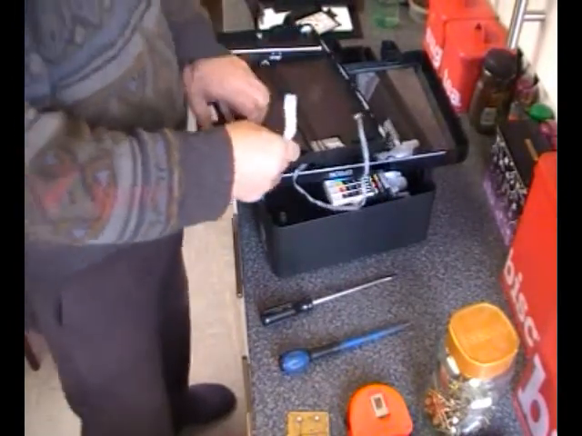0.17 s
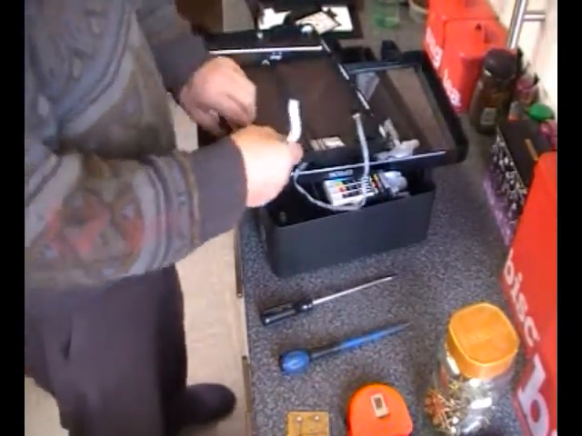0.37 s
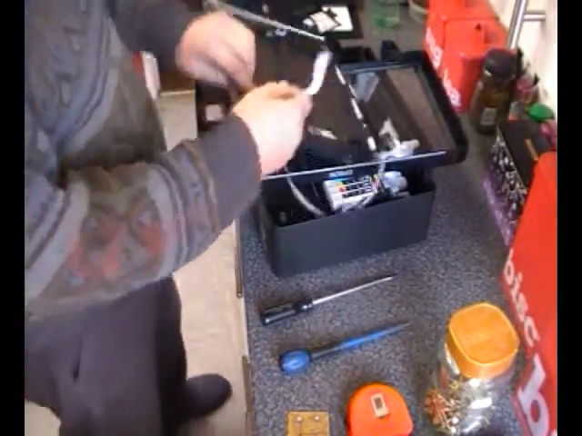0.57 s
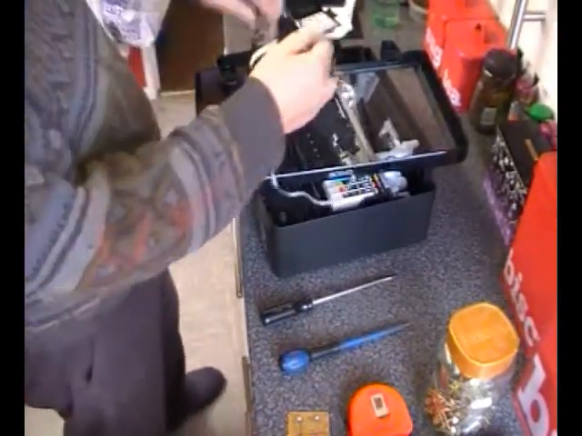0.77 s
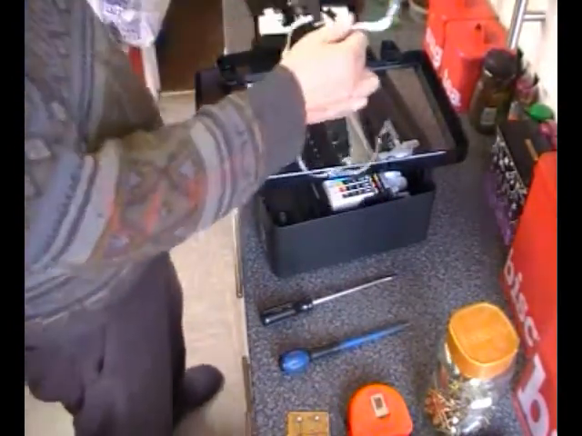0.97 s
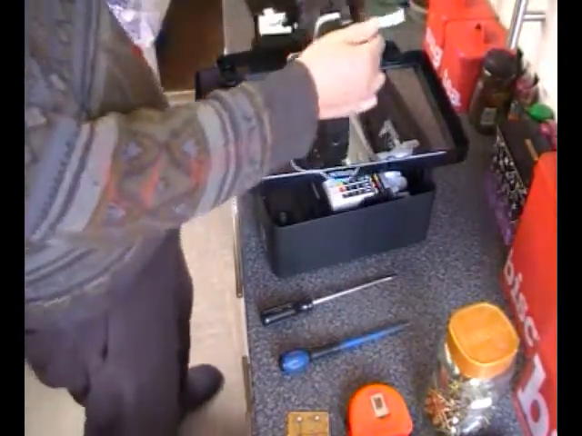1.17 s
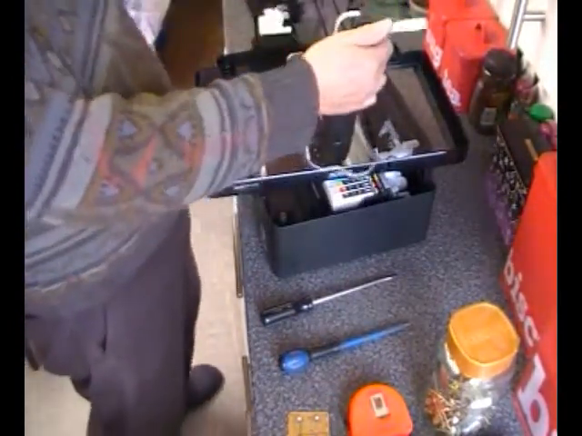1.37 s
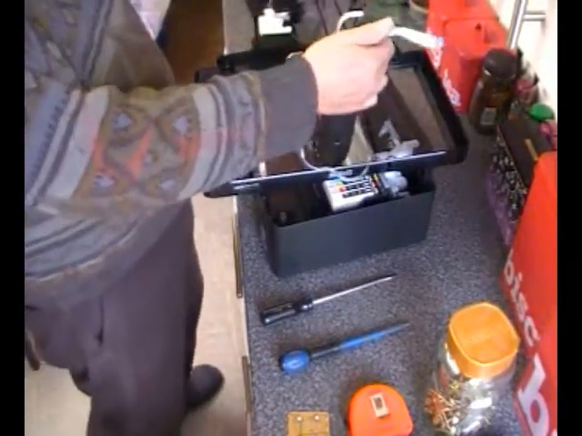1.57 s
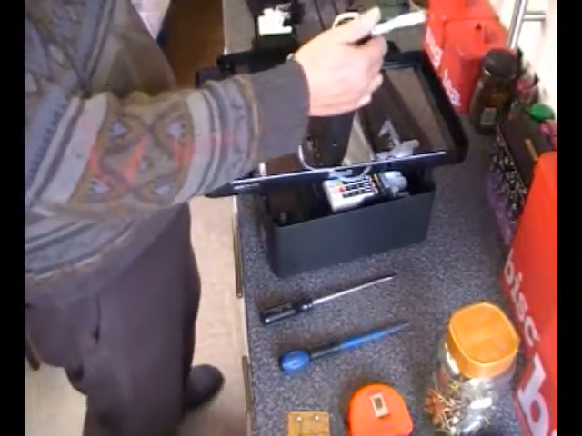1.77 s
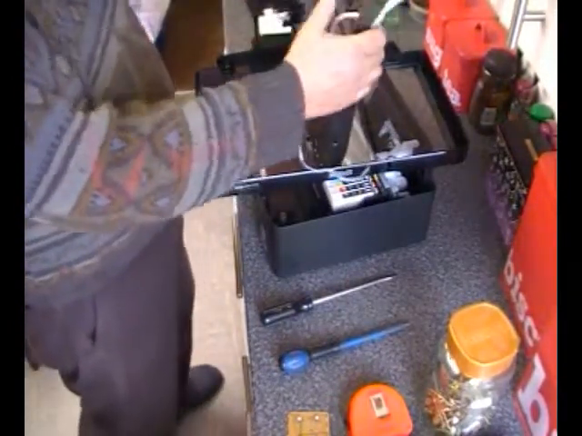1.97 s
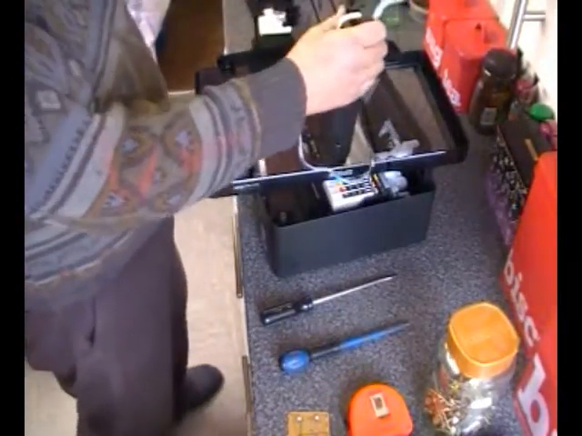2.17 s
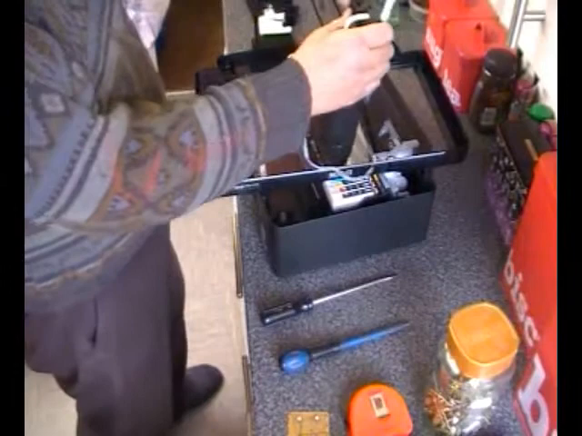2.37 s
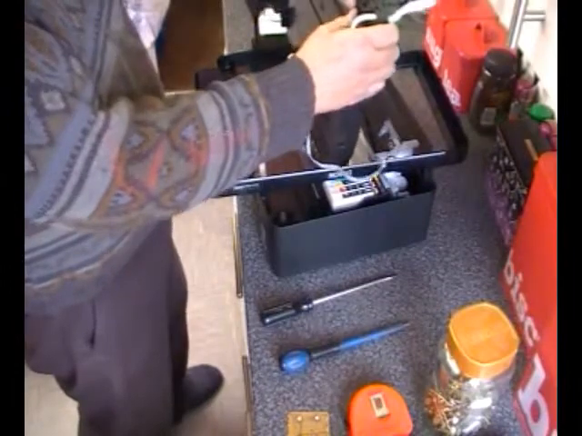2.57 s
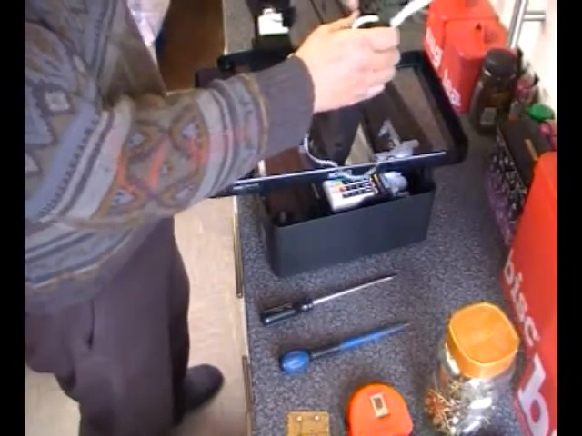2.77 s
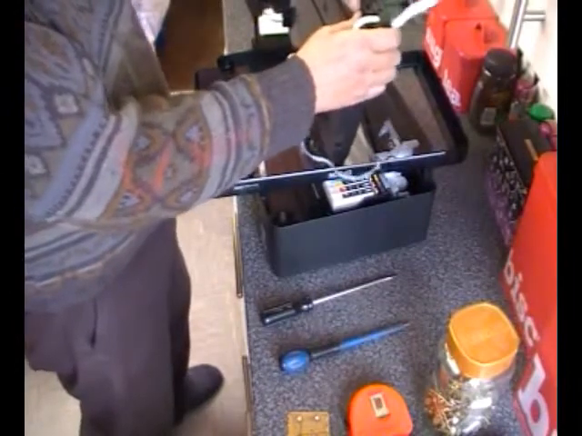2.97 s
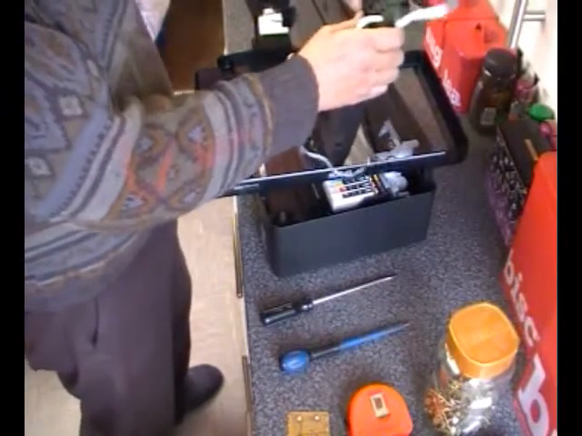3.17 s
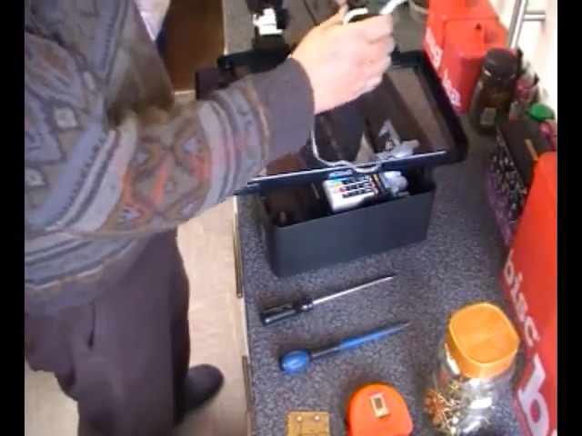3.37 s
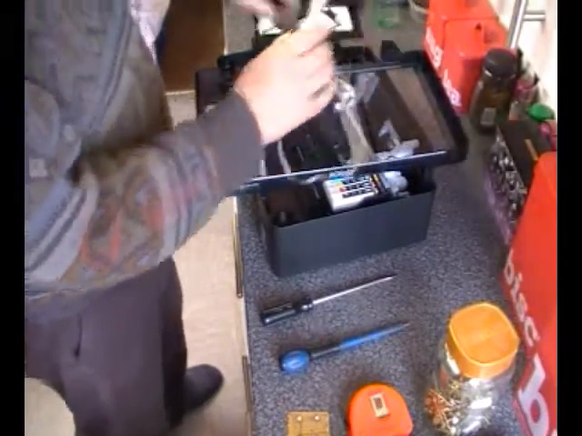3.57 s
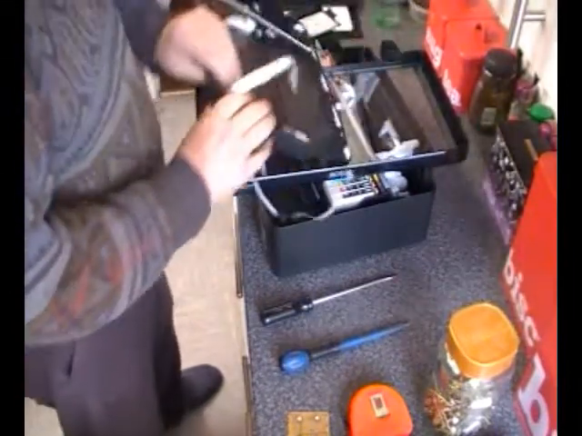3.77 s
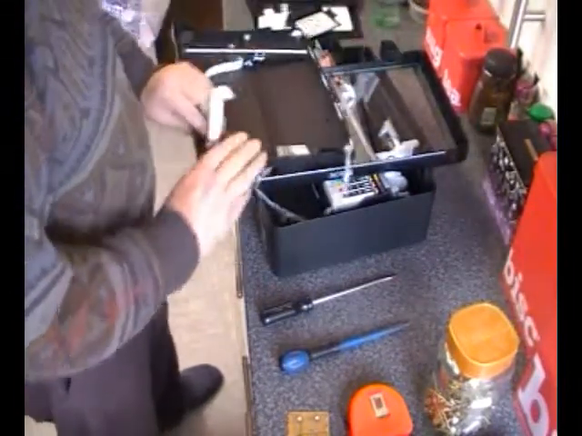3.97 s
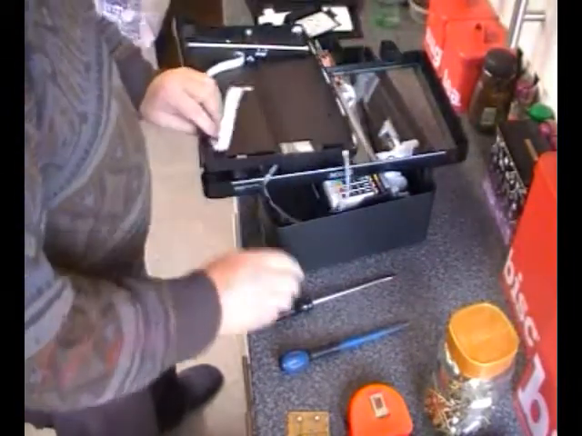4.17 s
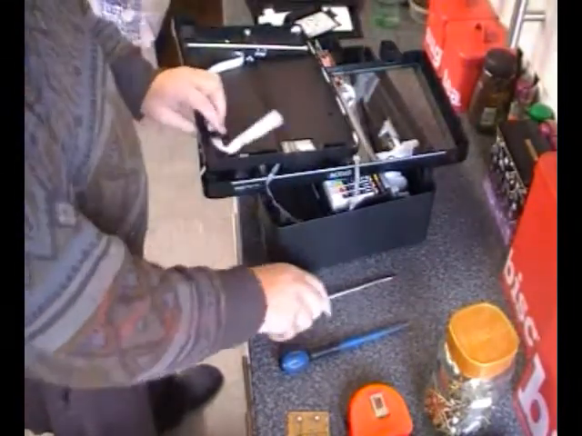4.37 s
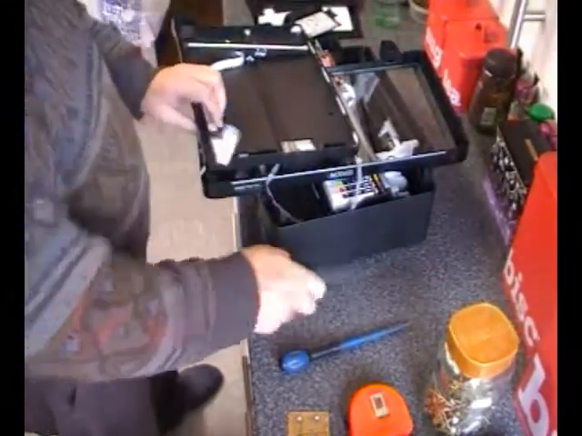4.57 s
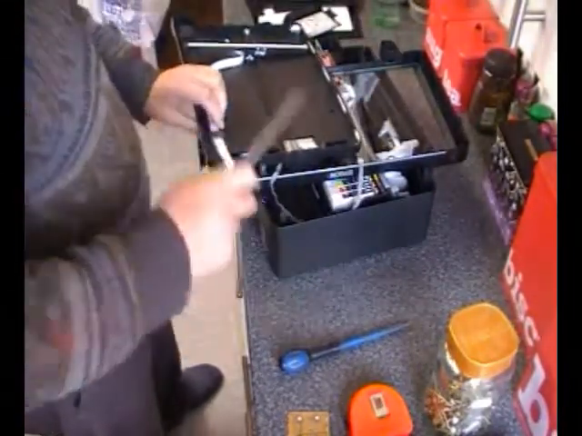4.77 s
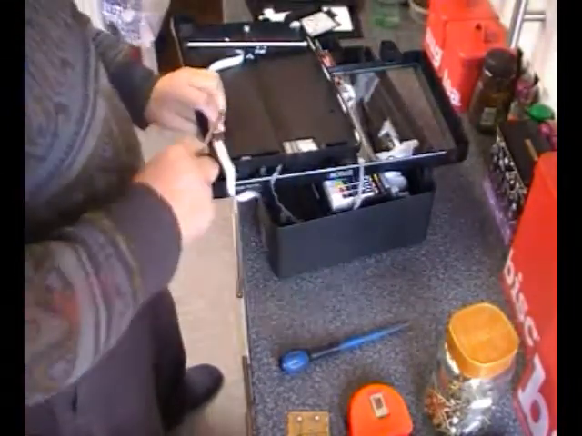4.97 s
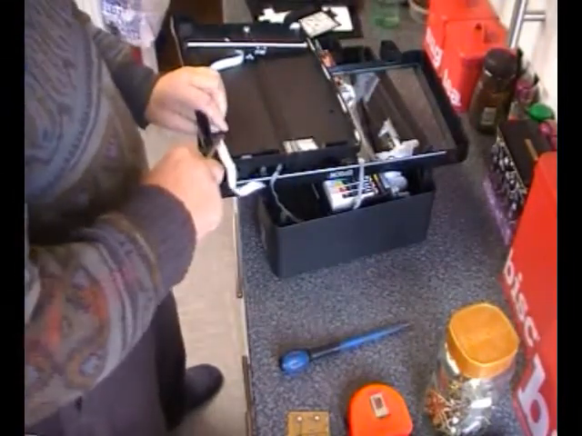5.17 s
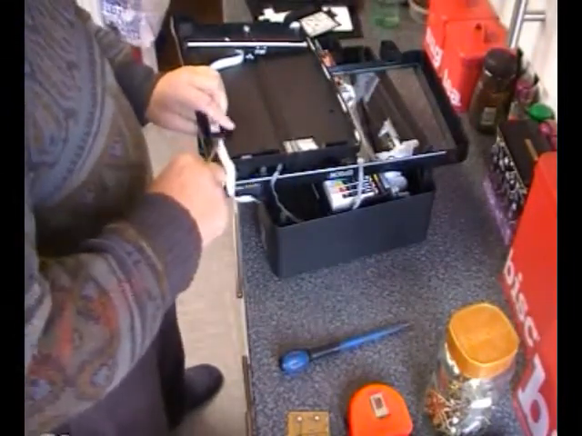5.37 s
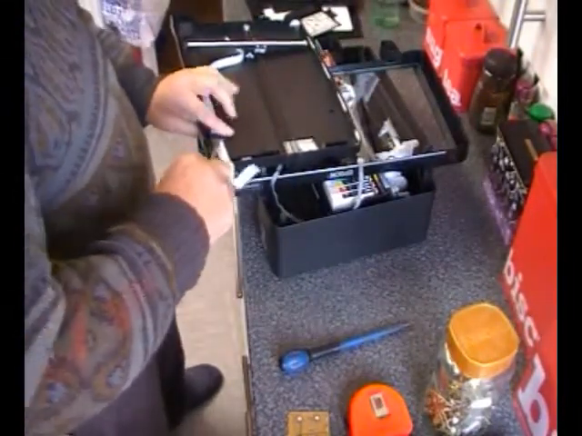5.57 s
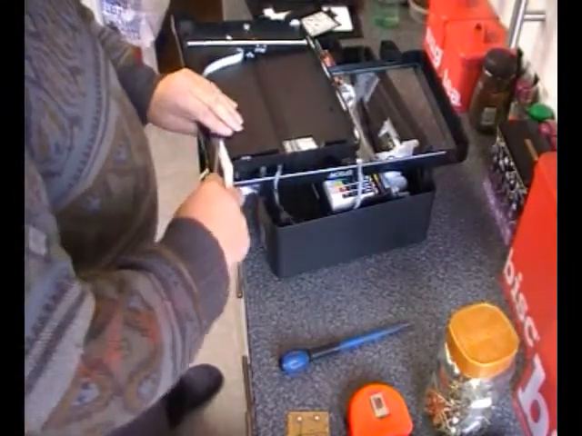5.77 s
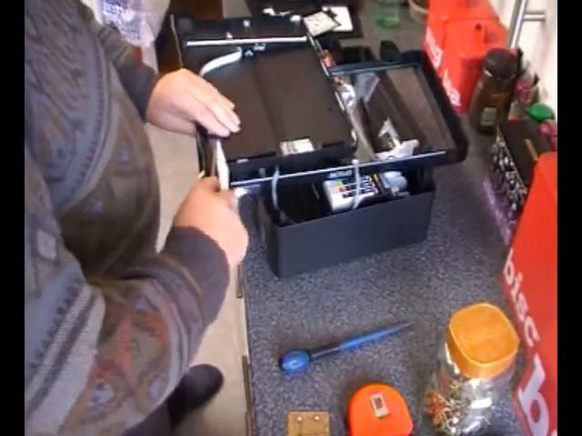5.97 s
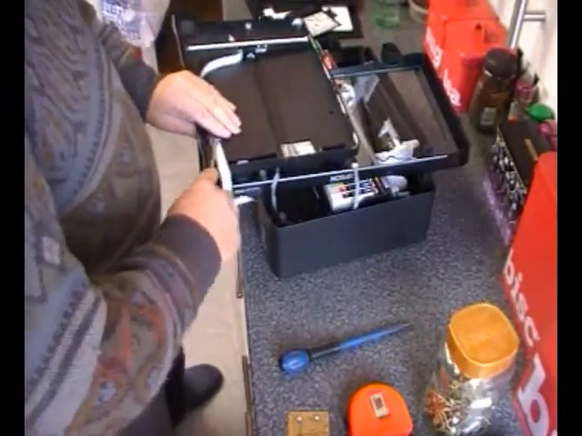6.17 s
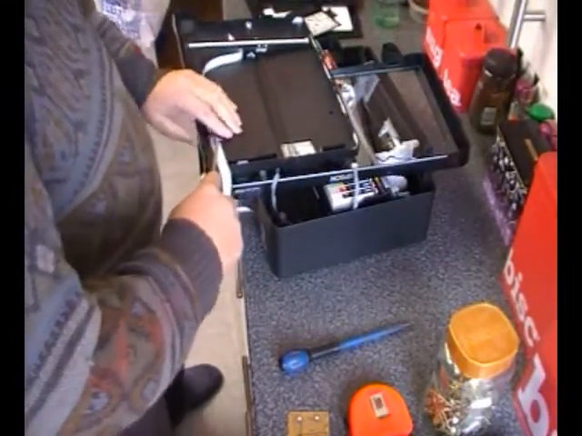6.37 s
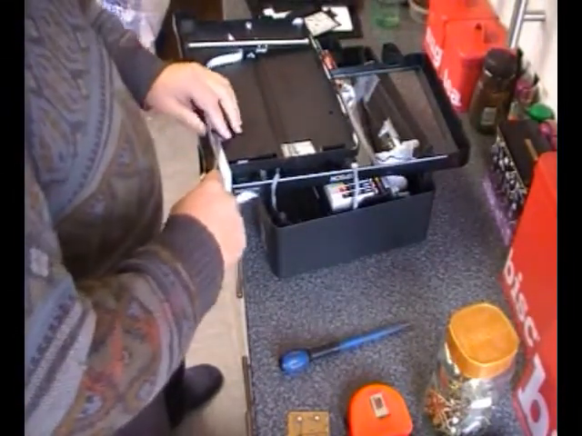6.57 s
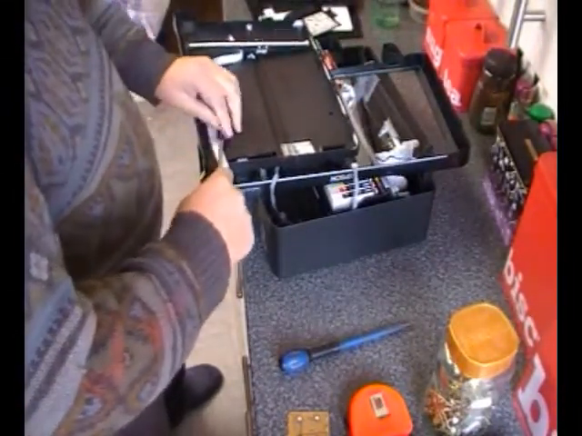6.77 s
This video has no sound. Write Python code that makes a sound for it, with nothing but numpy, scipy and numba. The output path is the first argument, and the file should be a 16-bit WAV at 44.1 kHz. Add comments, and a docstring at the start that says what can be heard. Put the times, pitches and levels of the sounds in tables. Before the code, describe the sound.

Close handling of a dismantled printer on a worktop: uneven rubbing and a slight panel hum, a sharp double click, small ticks and quieter scraping, then a bright springy snap. Later comes a cluster of heavy plastic knocks, brief screwdriver clatter, a solid steel knock, and busy cracking clicks while prying. A lively short room echo and low hiss surround it, with loud peaks slightly squeezed.

```python
"""On a worktop in a small hard-walled room, hands free a cable inside an opened printer, then pry with a screwdriver.
Plastic catches click, panels knock, wire ticks and steel knocks: each blow is a short burst of noise that rings a part.
Cable and fingers scrape in strokes of uneven slips, and one panel hums along as narrow-band noise.
The room answers blows and scrapes; steady hiss and low recorder noise that swells with the sound lie below,
and a camera's quick limiter tames the peaks."""
import sys
import numpy as np
from scipy import signal
from scipy.fft import rfft, irfft
from scipy.io import wavfile
from scipy.ndimage import uniform_filter1d
from numba import njit

SR = 44100
rng = np.random.default_rng(int(sys.argv[2]) if len(sys.argv) > 2 else 0)


def generate_wav(sig):
    """Save sig (samples, or channels by samples) to the path in sys.argv[1] as 16-bit PCM at SR."""
    pcm = np.round(np.clip(np.atleast_2d(sig).T, -1, 1) * 32767).astype(np.int16)
    wavfile.write(sys.argv[1], SR, pcm)


N = 300582
T = np.arange(N) / SR


def undb(db):
    """Turn decibels into a gain."""
    return 10 ** (np.asarray(db) / 20)


def unit(x):
    """Scale a sound to an average (rms) strength of 1."""
    return x / np.sqrt(np.mean(x ** 2))


def band(x, edges, order=3):
    """Keep mainly the pitches between two edges in Hz."""
    return signal.sosfilt(signal.butter(order, edges, "bandpass", fs=SR, output="sos"), x)


def convolve(x, response):
    """Pass a sound through an impulse response, keeping its length."""
    return signal.fftconvolve(x, response)[:len(x)]


def on_log_axis(hz, points):
    """Read a value between (f/Hz, value) points, along log frequency."""
    f, value = np.transpose(points)
    return np.interp(np.log(hz + 1), np.log(f), value)


# colour of the steady hiss: f/Hz, relative level/dB per Hz
HISS_COLOUR = [(20, -34.5), (70, -24), (140, -15), (230, -4.5), (450, -2.5), (900, -2), (2000, -2.5),
               (5000, -10.5), (13000, -14)]


def hiss(level_db=-57.5):
    """Steady background of room and microphone: random noise with a fixed colour."""
    hz = np.arange(N // 2 + 1) * SR / N
    spectrum = rfft(rng.standard_normal(N)) * undb(on_log_axis(hz, HISS_COLOUR))
    return undb(level_db) * unit(irfft(spectrum, N))


def recorder_noise(x, gain_db=-66, corner_hz=110, growth=0.38):
    """Low recorder noise swells with the loudness of the sound, but less strongly."""
    power = uniform_filter1d(x ** 2, SR // 50)
    strength = np.abs(power) ** (growth / 2)
    return undb(gain_db) * strength * unit(band(rng.standard_normal(N), (10, corner_hz), order=1))


def body(modes, ring_db, size=8192):
    """Response of a part: the bare contact plus resonances that die away; wider ones die sooner."""
    t = T[:size]
    response = np.zeros(size)
    for hz, width, db in modes:
        fade = np.exp(-np.pi * width * t)
        strength = undb(db + ring_db) * 2 * np.pi * width / SR
        response += strength * fade * np.cos(2 * np.pi * hz * t)
    response[0] += 1
    return response


def grains(size, spread_db):
    """Tiny stick-slip impulses, most weak and a few strong."""
    return rng.standard_normal(size) * undb(spread_db * np.minimum(rng.exponential(size=size), 6))


# how long the echo lasts at each pitch: f/Hz, time to fall 60 dB (T60)/s
ECHO_TIMES = [(200, 0.33), (800, 0.41), (3000, 0.31), (7000, 0.35), (12000, 0.25)]
# low resonances of the room: f/Hz, width/Hz, relative level/dB
ROOM_RESONANCES = [(204, 34, 11.5), (250.6, 11.3, 20), (362, 3.3, -42), (414, 6.8, -32)]


def room_tail(gain_db=2, gap_s=0.00037, build_s=0.0051, size=24576):
    """Worktop and near walls answer within milliseconds; each pitch range dies at its own rate, low modes ring."""
    t, hz = T[:size], np.arange(size // 2 + 1) * SR / size
    noise = rfft(grains(size, 1.57))
    edges = np.concatenate([[0], np.geomspace(400, SR / 2, 7)])
    tail = 0
    for lo, hi in zip(edges, edges[1:]):
        t60 = on_log_axis((lo + hi) / 2, ECHO_TIMES)
        slice_of_noise = irfft(noise * (hz >= lo) * (hz < hi))
        tail = tail + slice_of_noise * np.exp(-np.log(1000) * t / t60)
    tail = tail * np.clip((t - gap_s) / build_s, 0, 1)
    return undb(gain_db) * convolve(tail / np.linalg.norm(tail), body(ROOM_RESONANCES, ring_db=-7))


def registers(bands, tone, brightness, pivot_hz=2000):
    """Gain per event and band: the part's own tone, tilted up by a hard contact and down by a soft one."""
    octaves = np.log2(np.sqrt(np.prod(bands, axis=1)) / pivot_hz)
    return undb(np.array(tone) + np.outer(brightness, octaves))


# low, middle, upper and treble range of a blow: lower f/Hz, upper f/Hz
BLOW_RANGES = [(340, 660), (660, 2000), (2000, 4800), (5000, 14000)]
# All tables of blows: t/s, level/dB before the part's tone, brightness/dB per octave, chatter T60/s
# All tables of resonances: f/Hz, width/Hz, relative level/dB
# All tones of blows, how strongly a part radiates: low/dB, middle/dB, upper/dB, treble/dB


def blows(table, response, tone, rise_s, room_db=0, count=5, size=8192):
    """Each blow is a crack and a brief chatter that ring a part, heard directly and through the room."""
    t = T[:size]
    times, level_db, brightness, chatter_t60 = np.transpose(table)
    chatter = 1000. ** (-t / chatter_t60[:, None])
    crack = 0.091 * np.exp(-t / 0.00077)
    force = grains((len(times), size), 1.4) * (chatter + crack) * (1 - np.exp(-t / rise_s))
    ring = signal.fftconvolve(force, response[None], axes=1)[:, :size]
    sounds = 0
    for edges, gain in zip(BLOW_RANGES, registers(BLOW_RANGES, tone, brightness).T):
        part = band(ring, edges)
        # a blow's level is its energy packed into 4 ms
        strength = np.sqrt(np.sum(part ** 2, axis=1) / (.004 * SR))
        sounds = sounds + part * (undb(level_db) * gain / strength)[:, None]
    # blows land on different spots: a few patterns of reflections take turns
    tails = [room_tail() for _ in range(count)]
    # bright blows beam straight up, so less of them comes back from the room
    echo_db = room_db - 0.2 * np.maximum(brightness, 0)
    out = np.zeros(N + SR)
    for k, (s, sound) in enumerate(zip(times, sounds)):
        start = int(s * SR)
        echo = signal.fftconvolve(sound, tails[k % count])
        out[start:start + size] += sound
        out[start:start + len(echo)] += undb(echo_db[k]) * echo
    return out[:N]


# thumps of the case, its resonances and its tone: columns as listed above blows
THUMPS = [(1.195, -44.5, 0, .03), (1.222, -38, 0, 0.025)]
CASE_RESONANCES = [(363, 32, -2), (850, 63, -1)]
CASE_RADIATION = (-1.5, -2.5, -42, -9.5)


def case_thumps():
    """The hollow case rocks on the worktop and rings at two pitches."""
    response = body(CASE_RESONANCES, ring_db=10)
    return blows(THUMPS, response, CASE_RADIATION, rise_s=0.004, room_db=4.5, count=2)


# flicks of the wire, its resonances and its tone: columns as listed above blows
WIRE_FLICKS = [(1.189, -41.5, 0.27, .012), (1.3, -49.5, 0.83, 0.077), (1.561, -51, 0.58, 0.013),
               (1.665, -57.5, 0.077, 0.025)]
WIRE_RESONANCES = [(6860, 150, -7), (7500, 460, -6), (8130, 300, 0)]
WIRE_RADIATION = (-3, -2.5, -6.5, -2.5)


def wire_ticks():
    """The wire flicks against small metal parts, which ring high up."""
    response = body(WIRE_RESONANCES, ring_db=19)
    return blows(WIRE_FLICKS, response, WIRE_RADIATION, rise_s=0.0014, room_db=2.5, count=2)


def stroke(start, length, swell_db, attack_s=0.029, release_s=0.033):
    """Pressure of one stroke: it sets in, grows or eases steadily, then lets go."""
    attack = np.clip((T - start) / attack_s, 0, 1)
    release = np.clip(1 - (T - start - length) / release_s, 0, 1)
    progress = np.clip((T - start) / length, 0, 1)
    return attack * release * undb(swell_db * (progress - .5))


# strokes that set the panel humming: t/s, length/s, mid-stroke level/dB, swell from start to end/dB
HUMMING_STROKES = [(0, 0.088, -52, 0), (0.172, 0.276, -55, 3)]


def panel_hum(mode_hz=856, width_hz=13):
    """The dragged cable's friction keeps one panel resonance sounding while the stroke lasts: narrow noise."""
    edges = (mode_hz - width_hz / 2, mode_hz + width_hz / 2)
    ring = unit(band(rng.standard_normal(N), edges, order=1))
    pressure = sum(undb(db) * stroke(start, length, swell_db)
                   for start, length, db, swell_db in HUMMING_STROKES)
    return ring * pressure


def hesitation(depth_db=2, rate_per_s=70):
    """A dragging hand catches and lets go many times a second: the level moves in small random steps."""
    hold = SR // rate_per_s
    steps = np.repeat(np.clip(rng.standard_normal(N // hold + 1), -2, 2), hold)[:N]
    return undb(depth_db * uniform_filter1d(steps, hold // 10))


# strokes over the shell: t/s, length/s, mid-stroke level/dB before tone, brightness/dB per octave,
# swell from start to end/dB
SHELL_STROKES = [(0, 0.08, -43.5, 1, -22), (0.132, 0.1, -49.5, 2, 12), (0.285, 0.032, -43.5, 0, 1.5),
                 (0.354, 0.19, -42, 0, 2.5), (0.56, 0.12, -45, 0.4, -14), (0.762, 0.067, -41, -1, -11),
                 (0.854, 0.15, -47.5, 1.5, -3.5), (1.029, 0.084, -51.5, -1, 1),
                 (1.334, 0.067, -56, 0.8, -2), (1.698, 0.061, -58.5, 1.5, -8), (1.89, 0.23, -69.5, 5, 0),
                 (2.131, 0.047, -49.5, -0.5, 6.5), (2.314, 0.094, -50, -1, 2),
                 (2.63, 0.18, -53.5, 0.9, -7.5), (2.825, 0.17, -72, -4.5, -5), (3.294, 0.069, -51, -1, 7),
                 (3.503, 0.042, -37.5, .5, -7.5), (3.582, 0.25, -53.5, 0, -9), (3.792, 0.084, -46, 0.1, 16),
                 (3.857, 0.12, -34.5, -0.6, -4), (4, 0.045, -40, 2, 0), (4.34, .24, -52.5, -2, -5),
                 (4.845, 0.25, -63, -1, -21), (5.159, 0.068, -60, -1, -2), (5.35, 0.066, -45.5, -3, -17),
                 (5.525, .11, -61, -4.5, 6), (5.769, 0.066, -36, -0.7, -4),
                 (5.854, 0.098, -32, -2.5, -12.5), (6.098, 0.17, -39.5, -0.5, -5.5),
                 (6.335, 0.08, -42, 0.5, 1), (6.506, 0.13, -54, -1.5, -5), (6.654, 0.063, -48.5, -0.4, -15),
                 (6.764, .05, -63, 1, 0)]
# low, middle and treble range of a scrape: lower f/Hz, upper f/Hz
SCRAPE_RANGES = [(340, 700), (700, 4400), (4500, 14000)]
# how strongly scrapes radiate: low/dB, middle/dB, treble/dB
SCRAPE_RADIATION = (-11, 0, -3)
# resonances of the plastic shell, also used by the knocks and clicks below: f/Hz, width/Hz, relative level/dB
SHELL_RESONANCES = [(234.8, 19.3, -0.5), (315.5, 22, -0.5), (404.6, 3.2, -14), (575, 19, 5.5),
                    (600, 63, -1.5), (796, 59, 4), (899, 84, 9), (1040, 5.7, -13), (1196, 100, 3.5),
                    (1353, 250, 5.5), (1554, 140, 6.5), (1681, 44, 1.5), (1806, 180, 6.5), (2155, 170, 6),
                    (2397, 120, 3.5), (2670, 120, -7), (2800, 450, 6.5), (3174, 42, 6.5), (3340, 400, 3.5),
                    (3930, 200, 2)]


def scraping(slips_per_s=420, slip_s=0.0031, spread_db=2.5, ticks_per_s=70, tick_db=-6, room_db=2):
    """Cable and fingers drag over the shell in strokes made of uneven little slips."""
    slip_happens = rng.random(N) < slips_per_s / SR
    slips = slip_happens * undb(spread_db * np.minimum(rng.exponential(size=N), 3))
    # a little steady sliding lies under the slips
    grip = unit(convolve(slips, np.exp(-T[:SR // 20] / slip_s))) + .15
    # an edge catches on a rib and lets go with a tick
    ticks = (rng.random(N) < ticks_per_s / SR) * rng.standard_normal(N)
    rubbing = unit(grip * rng.standard_normal(N)) + undb(tick_db) * unit(ticks)
    scrape = convolve(rubbing, body(SHELL_RESONANCES, ring_db=0.5))
    pressure = 0
    for start, length, db, brightness, swell_db in SHELL_STROKES:
        gains = registers(SCRAPE_RANGES, SCRAPE_RADIATION, brightness).T
        pressure = pressure + gains * undb(db) * stroke(start, length, swell_db)
    sound = sum(unit(band(scrape, edges)) * gain for edges, gain in zip(SCRAPE_RANGES, pressure))
    sound = sound * hesitation()
    return sound + undb(room_db) * convolve(sound, room_tail())


# clicks of the latch, its resonances and its tone: columns as listed above blows
LATCH_CATCHES = [(4.127, -24, 1.1, 0.017), (4.184, -30, 0.46, .02)]
LATCH_RESONANCES = [(4760, 75, -9), (6300, 70, -6), (8240, 300, 4), (9900, 200, -13), (12200, 430, 2)]
LATCH_RADIATION = (-24, -16, -2.5, 2)


def latch_clicks():
    """A latch catches as the lid comes down, with a sharp start and a bright ring."""
    response = body(LATCH_RESONANCES, ring_db=2)
    return blows(LATCH_CATCHES, response, LATCH_RADIATION, rise_s=0.00045, room_db=-3, count=1)


# snaps of the cable clip, its resonances and its tone: columns as listed above blows
CABLE_SNAPS = [(2.436, -21.5, 0, 0.024), (2.485, -25.5, 0, 0.02)]
CLIP_RESONANCES = [(208, 32, 5.5), (623, 38, 9.5), (2600, 590, -2), (5450, 130, -7), (5860, 72, -15),
                   (7250, 77, -1), (7680, 190, 6), (9900, 84, -14)]
CLIP_RADIATION = (-15.5, -11, 0, 1)


def clip_snaps():
    """The cable springs out of its clip, which rings both low and high."""
    response = body(CLIP_RESONANCES, ring_db=4)
    return blows(CABLE_SNAPS, response, CLIP_RADIATION, rise_s=0.0029, room_db=1, count=2)


# clatter of the screwdriver, its resonances and its tone: columns as listed above blows
TOOL_CLATTER = [(4.493, -34, -7.5, 0.27), (4.514, -39, 6, 0.05), (4.56, -22, 2.5, 0.012),
                (4.581, -22.5, 1.5, 0.079), (4.605, -40, -6, 0.017), (4.696, -42, 5.5, 0.16)]
TOOL_RESONANCES = [(850, 83, -4), (996, 34, -0.5), (1470, 120, -8), (1712, 97, 6.5), (2400, 240, 6),
                   (3040, 100, 11), (3440, 110, -18), (4200, 50, -25), (5800, 230, -5), (8320, 290, 2),
                   (11600, 320, -22)]
TOOL_RADIATION = (-21.5, -0.5, -6.5, -18)


def tool_rattles():
    """The screwdriver clatters as it is lifted, ringing at its own pitches."""
    response = body(TOOL_RESONANCES, ring_db=9)
    return blows(TOOL_CLATTER, response, TOOL_RADIATION, rise_s=0.0031, room_db=1, count=6)


# knocks of the blade, resonances and tone of the frame: columns as listed above blows
STEEL_KNOCKS = [(5.214, -48, 0.74, 0.027), (5.272, -15.5, 0.82, 0.029), (5.407, -27, 0, 0.027)]
FRAME_RESONANCES = [(560, 29, 7), (576, 15, 9), (837, 74, 14), (1190, 78, 1), (1480, 270, 6.5),
                    (1800, 280, 3), (2100, 250, 7), (2930, 200, 0), (3130, 200, -1), (3470, 150, -26),
                    (4660, 110, -18), (6450, 380, 6), (7100, 550, 0), (9100, 190, 6)]
FRAME_RADIATION = (-14.5, -1, -4.5, -11.5)


def blade_knocks():
    """The steel screwdriver blade knocks on the frame and makes it ring."""
    response = body(FRAME_RESONANCES, ring_db=6)
    return blows(STEEL_KNOCKS, response, FRAME_RADIATION, rise_s=.006, room_db=0, count=3)


# knocks of the panels and their tone: columns as listed above blows
PANEL_BLOWS = [(0.381, -32, 6, 0.048), (0.755, -27, -2.5, 0.023), (1.889, -48, -2, 0.035),
               (3.491, -38.5, 5.5, 0.078), (3.71, -30, 5, 0.014), (3.761, -26.5, 1, 0.024),
               (3.904, -20, 1, 0.038), (4.043, -12.5, 0, 0.082), (4.079, -18.5, -1.5, 0.032),
               (4.111, -32, -1.5, .03), (5.869, -21.5, 1.5, .035), (6.132, -30.5, -5, 0.075),
               (6.168, -22, 1, 0.075), (6.342, -24.5, -1, 0.033)]
PANEL_RADIATION = (-12.5, -1, -1, -15.5)


def panel_knocks():
    """Broad plastic panels knock together: the shell rings with little treble."""
    response = body(SHELL_RESONANCES, ring_db=-1)
    return blows(PANEL_BLOWS, response, PANEL_RADIATION, rise_s=0.002, room_db=-1, count=4)


# clicks of the plastic catches and the shell's tone: columns as listed above blows
CATCH_CLICKS = [(0.024, -31, 0, 0.035), (0.349, -46, 7.5, .03), (0.664, -16.5, 0.5, .025),
                (0.678, -20, -3.5, 0.15), (0.738, -22, 3, .026), (0.893, -41.5, 6, 0.048),
                (0.953, -29, 3.5, 0.057), (1.066, -40.5, 3, 0.03), (2.176, -34.5, 1.5, .05),
                (2.374, -47, 5, 0.031), (2.602, -33, 4, .035), (2.621, -35.5, 3, .03),
                (2.659, -38.5, 3.5, 0.045), (2.727, -36, 3, 0.042), (3.351, -34.5, 2.5, .07),
                (3.58, -38.5, 5, 0.03), (3.931, -23.5, 1, 0.023), (4.051, -22.5, -5.5, 0.058),
                (4.061, -22, 5.5, 0.038), (4.123, -26.5, 4, 0.0074), (4.322, -41, -2, 0.13),
                (4.371, -35, 4, 0.058), (4.8, -41.5, -2.5, 0.03), (4.82, -38, -2.5, 0.076),
                (5.585, -36, -6.5, 0.08), (5.751, -25, 1, 0.071), (5.904, -20, -1.5, 0.0087),
                (5.998, -19.5, -0.5, 0.029), (6.122, -21, 2.5, 0.012), (6.208, -23.5, 1, 0.081),
                (6.318, -20, 1, 0.02), (6.384, -29, 2, .03), (6.425, -20, 1.5, 0.048),
                (6.444, -20, -1.3, 0.018)]
SHELL_RADIATION = (-16, -4.5, -1.5, -2.5)


def catch_clicks():
    """Plastic catches click and chatter: each sharp blow rings the shell."""
    response = body(SHELL_RESONANCES, ring_db=-1)
    return blows(CATCH_CLICKS, response, SHELL_RADIATION, rise_s=0.00055, room_db=-0.5)


def scene():
    """All contacts on the printer and the tool, over the quiet background."""
    sound = (catch_clicks() + panel_knocks() + clip_snaps() + wire_ticks() + latch_clicks()
             + tool_rattles() + blade_knocks() + case_thumps() + scraping() + panel_hum())
    # the microphone sits near a null of the room at one low pitch
    sound = signal.lfilter(*signal.iirnotch(297, 4.5, fs=SR), sound)
    return (sound + recorder_noise(sound) + hiss())[None]


@njit
def follow(x, attack, release):
    """Track loudness: rise quickly and fall more slowly."""
    out, e = np.empty(len(x)), 0.
    for i in range(len(x)):
        e += (abs(x[i]) - e) * (attack if abs(x[i]) > e else release)
        out[i] = e
    return out


def record(dry, limit_db=-13, attack_s=0.0003, release_s=0.0051, top_hz=12500):
    """The limiter ducks just after the hardest clicks; the top is cut steeply."""
    envelope = follow(dry[0], 1 / (attack_s * SR), 1 / (release_s * SR))
    limited = dry / np.maximum(envelope / undb(limit_db), 1)
    return signal.sosfilt(signal.ellip(10, .2, 70, top_hz, fs=SR, output="sos"), limited)


dry = scene()
out = record(dry)
generate_wav(out)
```